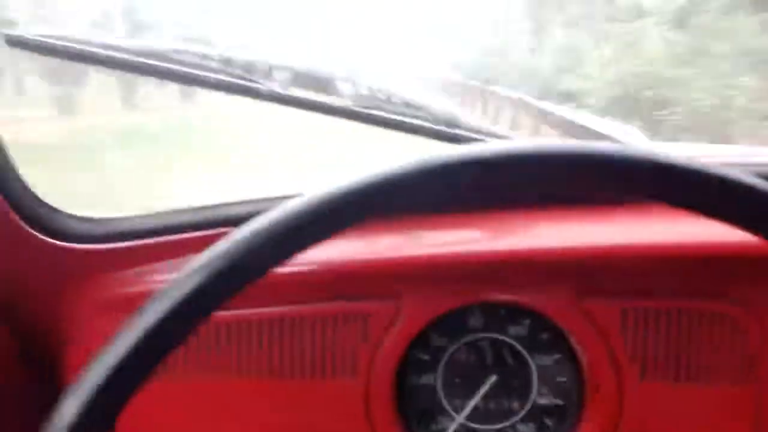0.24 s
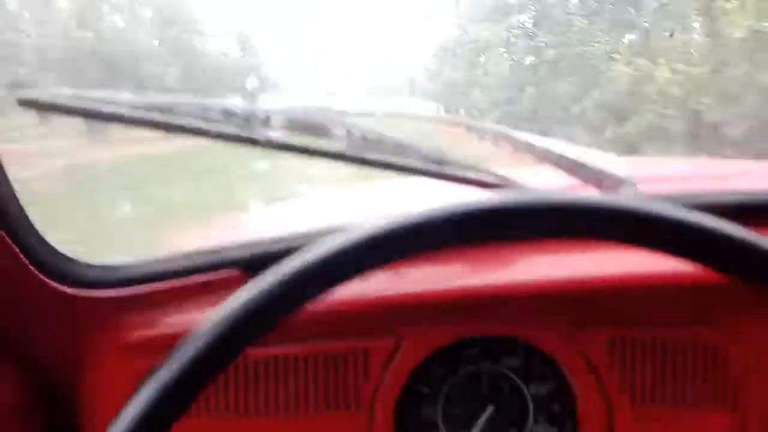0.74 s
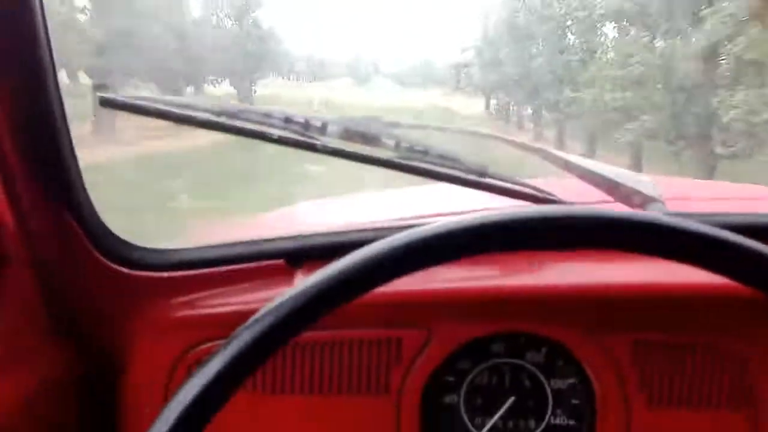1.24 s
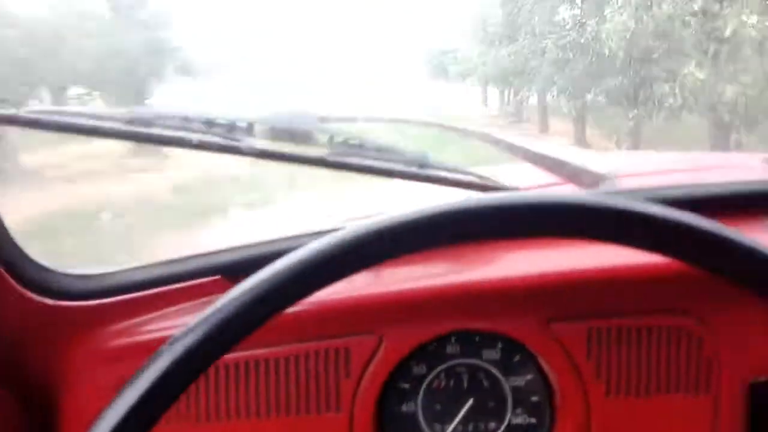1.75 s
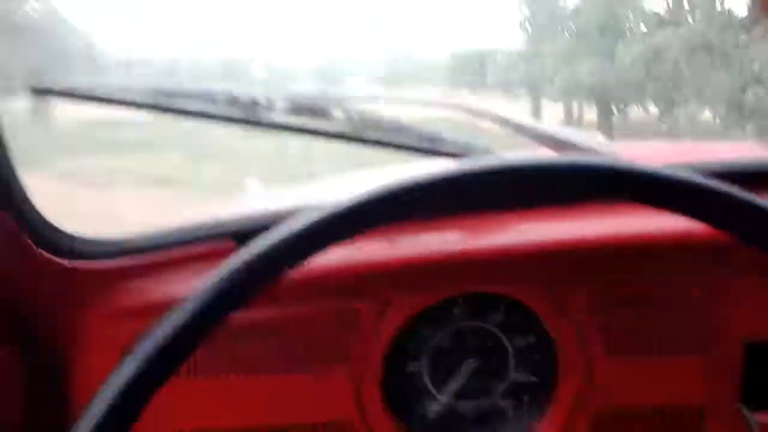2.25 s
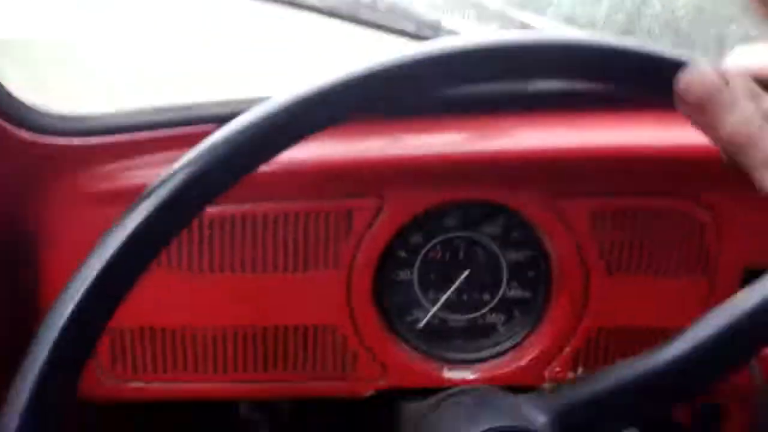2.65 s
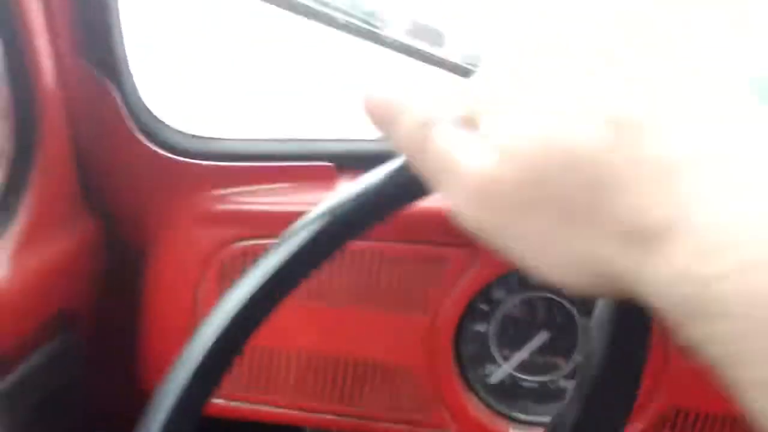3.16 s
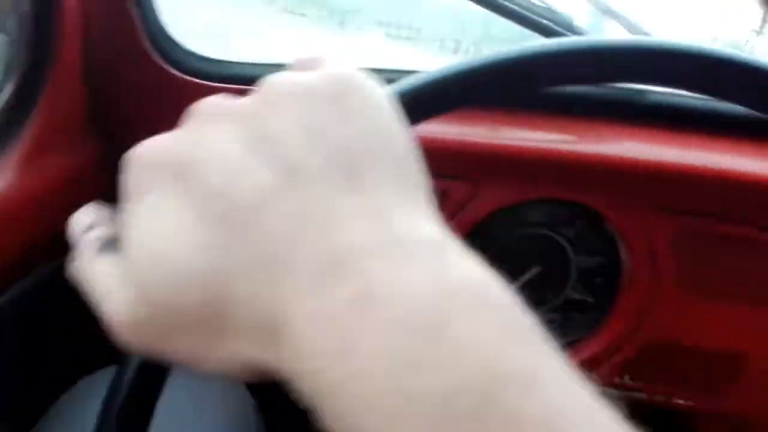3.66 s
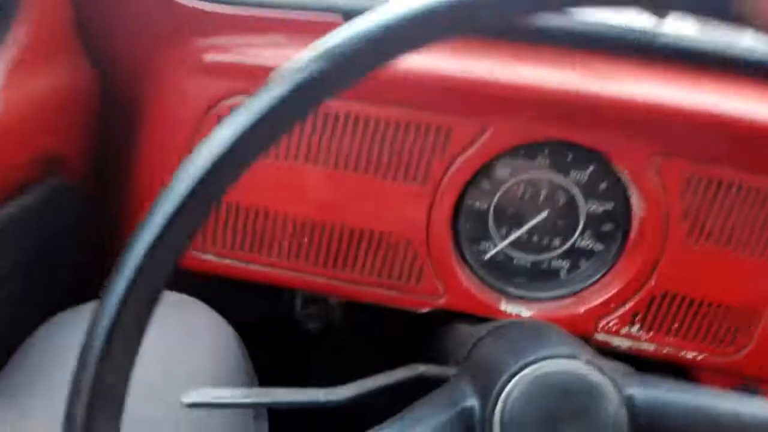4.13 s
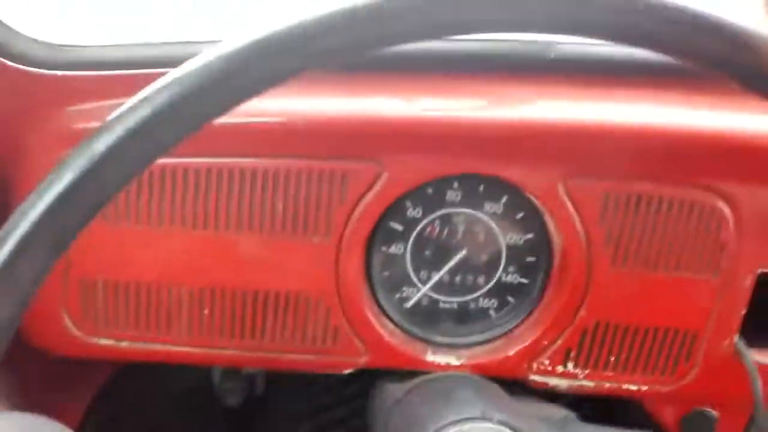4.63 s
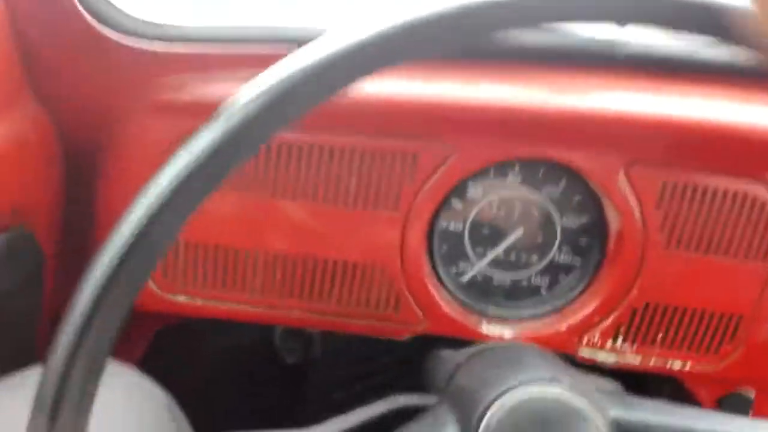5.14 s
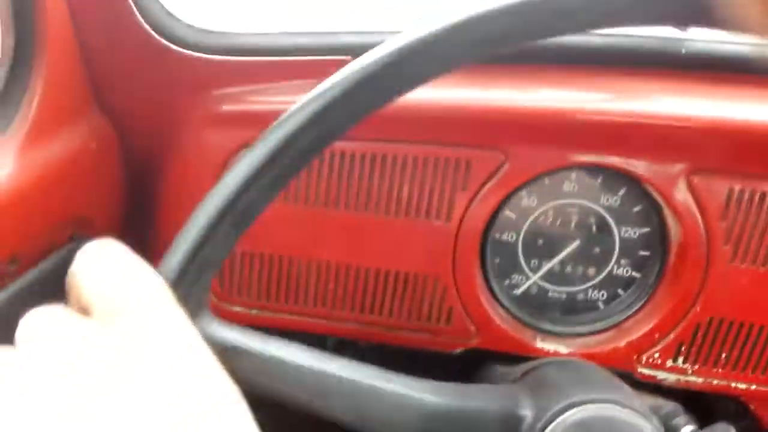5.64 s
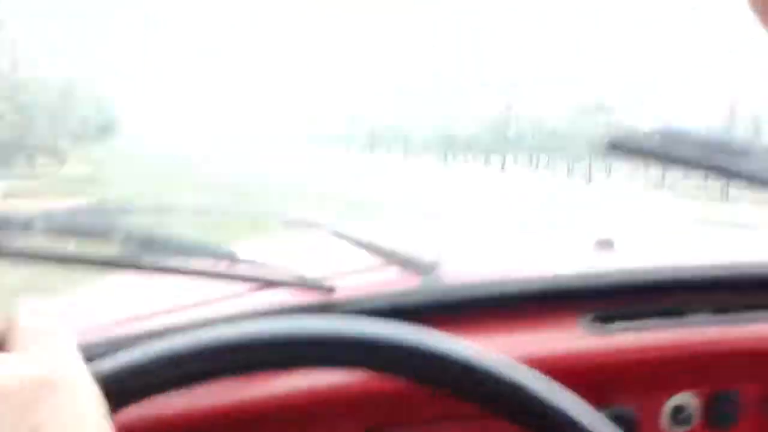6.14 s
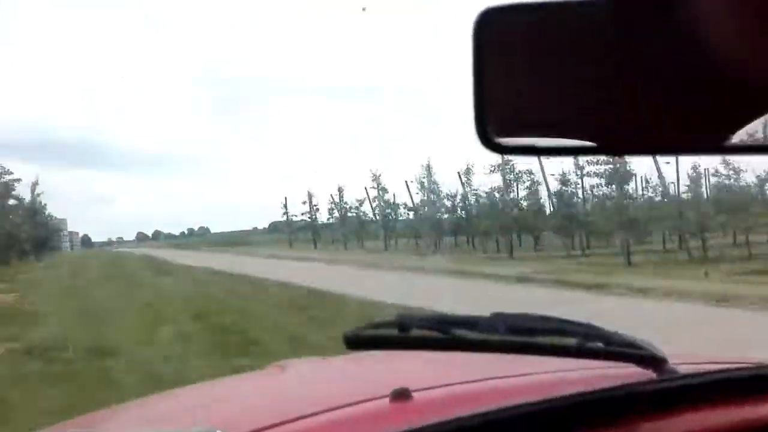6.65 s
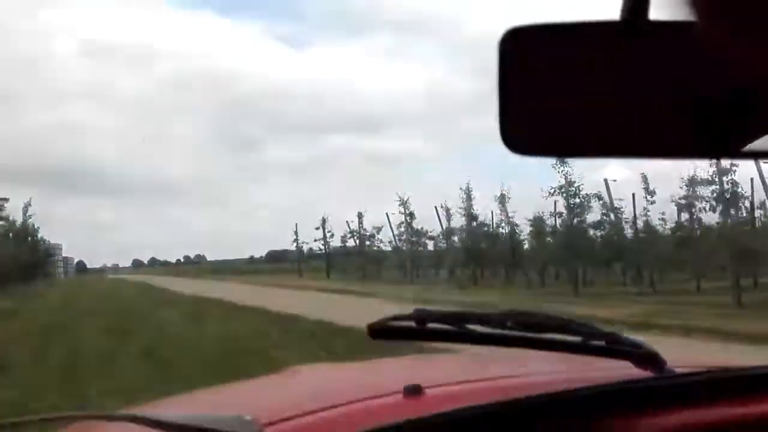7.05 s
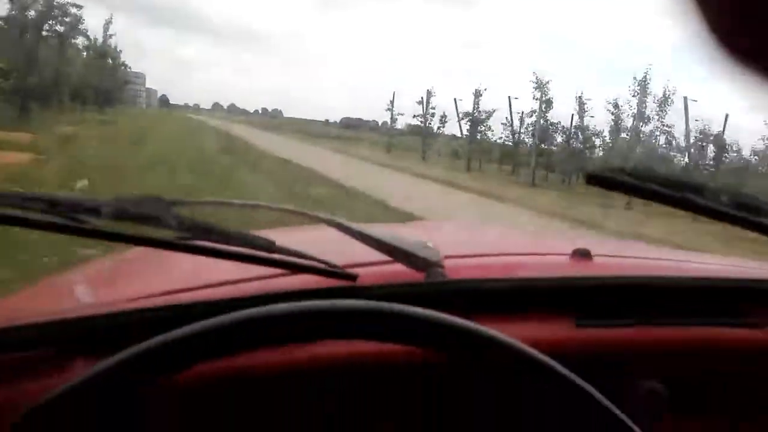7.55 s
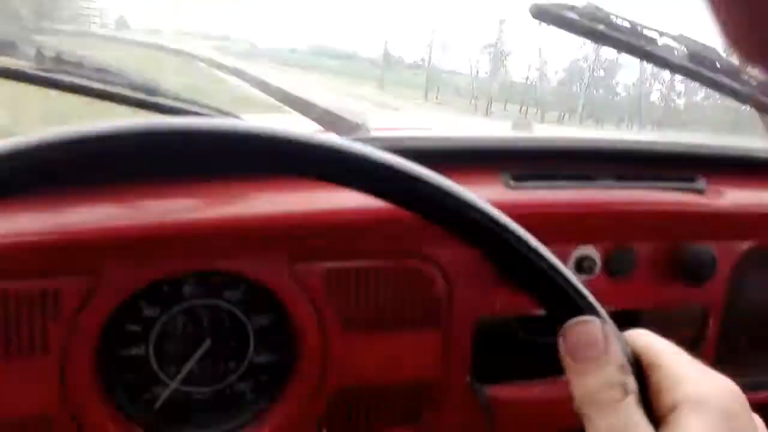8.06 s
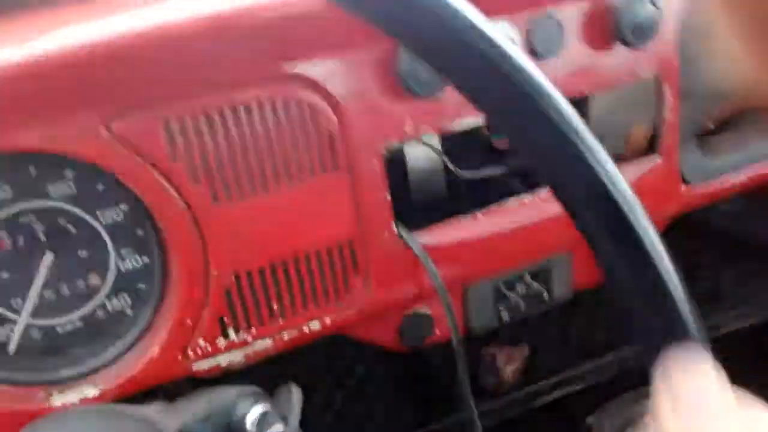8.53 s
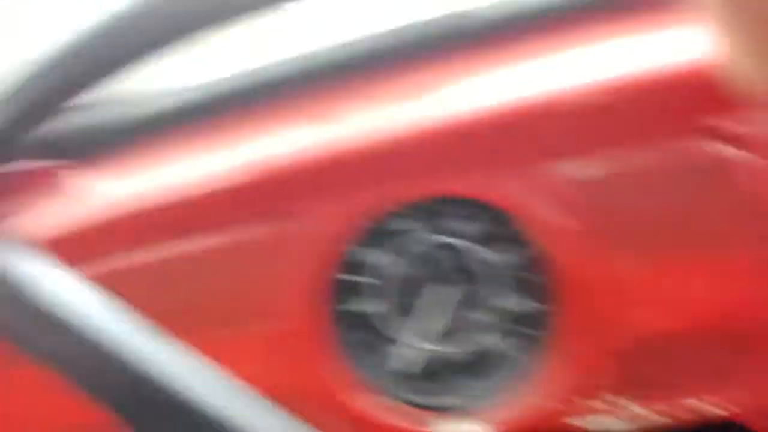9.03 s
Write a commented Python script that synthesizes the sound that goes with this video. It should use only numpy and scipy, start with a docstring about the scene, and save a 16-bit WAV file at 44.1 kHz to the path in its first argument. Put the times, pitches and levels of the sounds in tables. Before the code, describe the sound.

Close inside the cabin of an old small car, with short hard reflections from glass and steel. From 0 to 1.2 seconds the engine booms low, blips briefly near 0.5 and sags as the car lurches; panels thump, the floor drums, trim rattles and linkage clacks, with a hard hit at 1.0. From 1.2 to 4.5 the ride calms and revs steadily fall to a slow throb. Faint hand rubs come near 2.1, 2.3 and 2.8, a tiny squeak at 2.5, dull knocks from 2.7 to 3.1, clonks from 3.4 and a bump at 3.85. Metal clacks at 4.3 and 4.5. Then the engine pulls, burbling and increasingly booming, its pitch climbing to the end. Rattling surges from 5, with clonks around 5.2, sharp snaps near 5.85 and 6.05, and a bump at 6.75. A thin airy whistle and gear whine emerge after 7; rattles ease, then return by 9.

```python
"""In the driver's seat of an old air-cooled flat-four car, the microphone close to glass and bare steel.
The car first slows over bumps and ruts on a field track: panels thump, the boom sags, gear linkage clacks.
Then hands slide on the wheel rim, trim squeaks and drive slack knocks as the engine runs down for the turn.
Last it pulls away along a lane: the engine's orders boom louder, joints clonk, trim rattles and a thin
whistle rises. Orders are sines locked to the crank; clatter and rumble are filtered noise; hits ring modes."""
import sys
import numpy as np
from scipy import signal
from scipy.fft import rfft, irfft
from scipy.io import wavfile
from scipy.ndimage import uniform_filter1d

SR = 44100
rng = np.random.default_rng(int(sys.argv[2]) if len(sys.argv) > 2 else 0)


def materialize(psi):
    """Save the field psi as 16-bit PCM at rate SR to the path in sys.argv[1].

    A 1-D psi becomes a single channel; in a 2-D psi each row is a channel.
    """
    bounded = np.clip(np.atleast_2d(psi).T, -1, 1)
    quanta = np.round(bounded * 32767).astype(np.int16)
    wavfile.write(sys.argv[1], SR, quanta)


N = 409688
TIME = np.arange(N) / SR
CRUISE_HZ = 30  # crankshaft turns per second


# The cabin's gain for even orders, the firing. Each row: frequency in Hz, gain in dB.
EVEN_BOOM = [(42.0, -19.5), (58.0, -18.5), (72.0, -1.06), (88.0, 4.5), (104.0, 10), (116.0, 11.5),
             (134.0, 13), (148.0, 15), (162.0, 15), (190.0, 5.5), (210.0, 0.5), (232.0, -3), (255.0, -18),
             (320.0, -25.3)]
# The cabin's gain for odd orders, the rocking of the engine. Each row: frequency in Hz, gain in dB.
ODD_BOOM = [(58.0, -2.5), (72.0, 3), (88.0, 5), (104.0, 6.5), (116.0, 4.5), (134.0, 2), (148.0, 7),
            (162.0, 11.5), (190.0, -1), (210.0, 2), (232.0, -0.5), (255.0, -7.1), (320.0, -21.5)]
# Booming engine orders. Each row: multiple of the crank rate, level in dB at cruising revs and 0 dB throttle
# before the cabin's gain, dB per dB of throttle, dB per octave of revs.
ORDERS = [(2, -15, 0, -9), (3, -33, 0.73, 10), (4, -33, 0.79, -22), (5, -30.5, 0.89, -9.5),
          (6, -39, 0.86, 15.5), (8, -35, 1.24, 17.5)]


def boom(hz, turns, throttle, waver_db=0.8, overrun_waver_db=0.15, smear_turns=0.0753):
    """Engine orders follow throttle and revs through the cabin; higher ones lag, so the note throbs."""
    # the level wavers more as the throttle falls below 0 dB
    waver = waver_db + overrun_waver_db * np.maximum(-throttle, 0)
    octaves = revs(hz)
    out = np.zeros(N)
    for multiple, db, per_throttle, per_octave in ORDERS:
        level_db = db + per_throttle * throttle + per_octave * octaves + waver * walk(11)
        lagged_turns = turns - smear_turns * multiple
        tone = np.sqrt(2) * np.sin(2 * np.pi * multiple * lagged_turns)
        cabin_gain = response(multiple * hz, ODD_BOOM if multiple % 2 else EVEN_BOOM)
        out += tone * cabin_gain * undb(level_db)
    return out


# Lurches on the track. Each row: centre in seconds, change of the boom in dB.
LURCHES = [(.41, -3), (.66, -7), (.88, -3), (1.39, -1)]


def lurches(width_s=.05):
    """Gain of the boom: a brief sag as the car lurches."""
    return undb(sum(db * np.exp(-((TIME - s) / width_s) ** 2) for s, db in LURCHES))


# Exhaust burble. Each row: multiple of the crank rate, relative level in dB.
BURBLE = [(2.5, -2.5), (3.5, -1.5), (4.5, -11), (5.5, -8), (6.5, -8.5), (7.0, -5.5), (7.5, -3.5),
          (8.5, -7.5), (9.0, -9.5), (9.5, -3), (10.0, -9.5), (10.5, -18.5), (11.0, -13.5), (11.5, -8),
          (12.0, -13.5), (12.5, -6), (13.0, -13), (13.5, -1)]
# How the body passes the burble. Each row: frequency in Hz, gain in dB.
BODY = [(60.0, -13), (100.0, -4.5), (140.0, 1.5), (175.0, -3.5), (200.0, -14), (230.0, -3.5), (260.0, -17),
        (300.0, -21.5), (370.0, -27.5), (450.0, -33.5), (550.0, -30)]


def burble(hz, turns, throttle, burble_db=-31.5, per_throttle=.62, db_per_octave=-13, waver_db=2):
    """Unequal exhaust pipes add half and whole orders, favoured at low revs and open throttle."""
    lines = np.zeros(N)
    for multiple, db in BURBLE:
        level = undb(db + waver_db * walk(11))
        lines += order_tone(turns, multiple) * response(multiple * hz, BODY) * level
    return lines * undb(burble_db + per_throttle * throttle + db_per_octave * revs(hz))


# Roar of crankcase and tinware. Each row: frequency in Hz, relative spectral level in dB.
CASING_COLOUR = [(220, -22), (360, 4.5), (420, -6), (490, -0.5), (580, -8), (680, -2), (800, 1),
                 (950, -0.5), (1100, -3.5), (1250, -4.5), (1550, -9.5), (2100, -16), (3000, -20),
                 (6000, -56.5)]


def casing(hz, turns, shake, casing_db=-43.5, per_shake=0.26, db_per_octave=1.8,
           firing_depth=0.2, flutter_db=1):
    """Crankcase and tinware roar with each firing; impacts returning every cycle add a faint comb."""
    throb = 1 + firing_depth * np.cos(2 * np.pi * 2 * turns)  # two firings a turn
    impacts = np.zeros(N)
    for angle, strength in zip(rng.random(size=24), rng.choice([-1, 1], size=24)):
        at = np.flatnonzero(np.diff(np.floor(turns / 2 + angle)))  # once in two turns
        impacts[at] += strength * undb(3 * rng.standard_normal(len(at)))
    roar = unit(colour(unit(noise() * throb) + .4 * unit(impacts), CASING_COLOUR))
    return roar * undb(casing_db + per_shake * shake + db_per_octave * revs(hz) + flutter_db * walk(25))


# Valve clatter. Each row: frequency in Hz, relative spectral level in dB.
VALVE_COLOUR = [(900, -19.5), (1700, 3.5), (2300, 1), (2800, -5.5), (3550, 3.5), (4400, -1.5), (5200, -10),
                (6200, -18.5), (7500, -32.5), (14000, -40)]


def valves(hz, turns, shake, valve_db=-52.5, per_shake=.41, db_per_octave=1.5, hiss=0.72, flutter_db=1.96):
    """Eight valves each tap once in two turns at random strengths, over hiss; revs and shaking lift it."""
    tap, since = np.divmod(4 * turns, 1)  # tap number, and the part of a tap interval since
    strengths = undb(3.5 * np.clip(rng.standard_normal(size=2048), -2, 2))
    gate = hiss + strengths[tap.astype(int)] * np.exp(-since / .35)
    clatter = unit(colour(noise() * gate, VALVE_COLOUR))
    return clatter * undb(valve_db + per_shake * shake + db_per_octave * revs(hz) + flutter_db * walk(30))


# Rumble of the body on its springs. Each row: frequency in Hz, relative spectral level in dB.
RUMBLE_COLOUR = [(8, -24.5), (16, -9.5), (26, -1), (42, 0.5), (56, -8), (80, -21.5), (140, -47.5)]
# Drumming of the floor pan. Each row: frequency in Hz, relative spectral level in dB.
DRUM_COLOUR = [(35, -19), (60, -1), (100, 0), (165, -3), (195, -10), (230, -11), (270, -12), (330, -27.5),
               (420, -34.5), (700, -50.5)]


def wheels(hz, shake, rumble_db=-23.0, rumble_per_shake=.28, sway_db=0.6,
           drum_db=-30.5, drum_per_shake=.13, drum_db_per_octave=2):
    """The body sways and the floor pan drums, more on rough ground; the drumming also grows with revs."""
    rumble = unit(colour(noise(), RUMBLE_COLOUR))
    rumble *= undb(rumble_db + rumble_per_shake * shake + sway_db * walk(8.7))
    drum = unit(colour(noise(), DRUM_COLOUR))
    return rumble + drum * undb(drum_db + drum_per_shake * shake + drum_db_per_octave * revs(hz))


def ruts(centre_s=0.7, half_s=0.49, drum_db=-22.5):
    """A stretch of ruts makes the floor pan drum harder."""
    return unit(colour(noise(), DRUM_COLOUR)) * undb(drum_db) * np.exp(-((TIME - centre_s) / half_s) ** 2)


# Wheels hit bumps. Each row: middle in seconds, peak level in dB, pitch in Hz.
BUMPS = [(.089, -7, 45.2), (.731, -9.5, 41.5), (.793, -11, 48), (1.0, -4.5, 49.67), (2.378, -20, 40.47),
         (2.605, -20, 53.74), (2.722, -25, 41.98), (3.86, -13, 41.98), (5.447, -9, 42.21),
         (6.745, -10, 41.87)]
# Slack in the drive knocks off throttle. Each row: middle in seconds, peak level in dB, pitch in Hz.
KNOCKS = [(.88, -14.5, 162.9), (.99, -23, 330), (2.711, -16, 159.6), (2.846, -19, 167), (2.983, -14.5, 154),
          (3.125, -17, 160.4)]


def thumps(table, cycles):
    """Soft blows swing the panels briefly; the bell envelope falls to 1/e at `cycles` periods each side."""
    out = np.zeros(N)
    for s, db, hz in table:
        since = TIME - s
        out += undb(db) * np.cos(2 * np.pi * hz * since) * np.exp(-(since * hz / cycles) ** 2)
    return out


# Suspension clonks. Each row: start in seconds, loudest short-term level in dB.
CLONKS = [(1.945, -42), (3.403, -42.5), (3.527, -45), (3.671, -39.5), (3.905, -40), (3.965, -43),
          (4.860, -34.5), (4.922, -41), (5.157, -30), (5.369, -39), (5.455, -39), (6.727, -38.5),
          (7.076, -40.5), (9.189, -37.5)]
# Suspension and panel modes. Each row: frequency in Hz, width in Hz, gain in dB.
CLONK_MODES = [(333, 28, 8), (388, 7.9, -0.5), (660, 34, -3), (965, 41, -4), (1202, 40, 3), (1770, 78, -23),
               (2180, 92, -19), (3330, 320, -19.5)]


def clonks(contact_hz=3800):
    """Rubber-mounted joints hit their stops and ring the panels."""
    return blows(CLONKS, lambda x: modes(x, CLONK_MODES, contact_hz), rise_s=0.00083, hold_s=0.0061, t60=0.072)


# Gear lever and loose fittings. Each row: start in seconds, level in dB before the cabin's echoes,
# level of the rebound in dB relative to the first blow.
CLACKS = [(.389, -38.5, -19), (.562, -44.5, -12), (1.012, -45, -9), (1.151, -44, -15.5), (2.352, -40.5, -8),
          (4.265, -35, -4), (4.547, -40.5, 2)]
# Ring of the gear linkage. Each row: frequency in Hz, width in Hz, gain in dB.
CLACK_MODES = [(884, 50, 7.5), (1040, 22, 15), (1210, 820, 3), (1440, 89, 2.5), (1750, 66, 2.5),
               (1930, 490, -3), (2220, 110, -14), (2640, 50, -11), (3400, 88, -6), (3540, 110, -6),
               (3900, 33, -20.5), (4400, 120, 2)]


def clacks(contact_hz=4500, rasp_db=-31, rasp_hz=6500, rebound_s=.04):
    """Metal linkage chatters into place and rebounds once, with a little rasp of the contact itself."""
    hits = []
    for s, db, rebound_db in CLACKS:
        hits += [(s, db), (s + rebound_s, db + rebound_db)]
    soften = signal.butter(3, rasp_hz, fs=SR, output="sos")

    def ring(x):
        """Linkage modes plus the softened contact noise."""
        return modes(x, CLACK_MODES, contact_hz) + undb(rasp_db) * signal.sosfilt(soften, x)

    return blows(hits, ring, rise_s=.0004, hold_s=0.016, t60=0.14)


# Hard hits on dashboard and floor. Each row: start in seconds, level in dB before the cabin's echoes, ring in Hz.
SNAPS = [(0.268, -57, 2900), (.991, -35, 810), (2.985, -47, 1001), (3.163, -51.5, 2592),
         (3.845, -46.5, 1491), (5.848, -35.5, 1090), (6.061, -39, 920), (8.271, -42, 998.7)]


def snaps():
    """Hard, short hits on the dashboard and floor, each with one broad ring."""
    out = np.zeros(N)
    for s, db, hz in SNAPS:
        ring = lambda x: modes(x, [(hz, hz, 0)], 1.95 * hz)
        out += blows([(s, db)], ring, rise_s=0.00039, hold_s=0.0089, t60=0.13)
    return out


# Sharpest ticks of loose trim. Each row: start in seconds, level in dB before the trim's colour.
TICKS = [(.1216, -50), (.161, -44.5), (.2708, -42.5), (.602, -49), (.7456, -48.5), (.8081, -50),
         (1.0065, -43), (2.359, -43.5), (3.1622, -55.5), (3.8413, -53.5), (3.8643, -49), (4.3057, -53.5),
         (4.5865, -48.5), (5.018, -48.5), (5.1131, -43.5), (5.2943, -47.5), (5.5706, -42), (5.6133, -43.5),
         (5.8494, -43), (6.0808, -44), (8.2608, -42.5)]
# Colour of the loose trim. Each row: frequency in Hz, gain in dB.
TRIM_COLOUR = [(700, -13.5), (1300, 4), (2800, 3.5), (4200, 5), (6000, -6.5), (7500, -13), (9400, -9.5),
               (11000, -18), (13000, -13), (14500, -17)]


def trim(shake, rattle_db=-54, per_shake=0.95, scatter_db=4.0, count=800):
    """Loose trim rattles at random as the ground shakes it, with some sharper ticks and one squeak."""
    times = rng.random(count) * N / SR
    levels = scatter_db * np.clip(rng.standard_normal(count), -2, 2)
    rattle = unit(blows(np.column_stack([times, levels]), small_part, rise_s=0.002, hold_s=.003, t60=0.053))
    rattle *= undb(rattle_db + per_shake * shake)
    ticks = blows(TICKS, small_part, rise_s=.0008, hold_s=0.0022, t60=0.062)
    squeal = lambda x: resonate(resonate(x, 5890, 50), 5890, 50)
    squeak = blows([(2.488, -59)], squeal, rise_s=.002, hold_s=.02, t60=.07)  # s, dB
    return colour(rattle + ticks, TRIM_COLOUR) + squeak


def small_part(x, ring_db=10):
    """Every loose part has four high resonances of its own, at random pitches."""
    return x + undb(ring_db) * sum(resonate(x, hz, 500) for hz in rng.uniform(3000, 13500, size=4))


# Hands slide along the wheel rim. Each row: middle in seconds, half length in seconds, level in dB before
# the uneven grip and the cabin's echoes.
SLIDES = [(2.074, 0.094, -68), (2.26, 0.072, -60.5), (2.82, .07, -62)]
# Colour of skin on the rim. Each row: frequency in Hz, relative spectral level in dB.
SLIDE_COLOUR = [(2000, 0.5), (4200, 5), (5600, -7), (7300, -8.5), (9000, -25.5), (13000, -32)]


def slides(grip_db=5.0):
    """Skin rubs unevenly on the steering wheel: noise whose level jitters within each swell."""
    swell = sum(undb(db) * np.exp(-((TIME - s) / half_s) ** 2) for s, half_s, db in SLIDES)
    return unit(colour(noise(), SLIDE_COLOUR)) * swell * undb(grip_db * walk(60))


# The fan and gears sing as the car gathers speed. Each row: time in seconds, reference level in dB.
WHISTLE = [(0, -82), (6.6, -74), (7.2, -66.5), (8, -62.5), (8.6, -61.5), (9.29, -60)]
# Resonances of the fan housing. Each row: frequency in Hz, width in Hz of each of two passes, gain in dB.
FAN_MODES = [(827, 50, -1), (2384, 53, 2.5), (3410, 130, -4)]
# Whine of the geared shafts. Each row: multiple of the crank rate, mean level in dB relative to WHISTLE.
WHINE = [(10.5, 3.5), (17, 1.5), (23, 1.5), (24.5, -0.5)]


def whistle(turns, air_db=2):
    """Air sings in the fan housing, with the whine of the gears alongside."""
    air = np.zeros(N)
    for hz, width, db in FAN_MODES:
        air += undb(db) * resonate(resonate(noise(), hz, width), hz, width)
    whine = sum(order_tone(turns, multiple) * undb(db + 2 * walk(4.8)) for multiple, db in WHINE)
    return (undb(air_db) * unit(air) + whine) * undb(curve(WHISTLE))


def cabin(x, echo_gain=.25, t60=.16):
    """Glass and bare steel close by: dense early echoes comb the clatter."""
    t = TIME[:SR // 8]
    echoes = rng.standard_normal(len(t)) * np.exp(-np.log(1000) * t / t60) * (t > .003)
    wet = signal.fftconvolve(x, echoes / np.linalg.norm(echoes))[:N]
    return (x + echo_gain * wet) / np.hypot(1, echo_gain)


def blows(table, ring, rise_s, hold_s, t60):
    """Each blow is a short chatter of contacts through the object's resonances, at its own level."""
    out, t = np.zeros(N + SR), TIME[:SR // 3]
    shape = (1 - np.exp(-t / rise_s)) * np.exp(-np.log(1000) * np.maximum(t - hold_s, 0) / t60)
    for s, db in table:
        sound = ring(rng.standard_normal(len(t)) * shape)
        loudest = np.sqrt(uniform_filter1d(sound ** 2, size=600).max())  # rms over 14 ms
        i = int(np.clip(s * SR, 0, N))
        out[i:i + len(t)] += undb(db) * sound / loudest
    return out[:N]


def modes(x, table, contact_hz):
    """A bank of resonances; a soft contact drives it little above contact_hz."""
    x = signal.sosfilt(signal.butter(8, contact_hz, fs=SR, output="sos"), x)
    return sum(undb(db) * resonate(x, hz, width) for hz, width, db in table)


def resonate(x, hz, width_hz):
    """One resonance, gain 1 at its centre."""
    return signal.lfilter(*signal.iirpeak(hz, hz / width_hz, fs=SR), x)


def order_tone(turns, multiple):
    """One engine order at rms 1, with a random phase."""
    return np.sqrt(2) * np.sin(2 * np.pi * (multiple * turns + rng.random()))


def revs(hz):
    """Engine speed in octaves above cruising."""
    return np.log2(hz / CRUISE_HZ)


def response(hz, points):
    """Gain of a (Hz, dB) spectrum at the given frequencies, -80 dB beyond its ends."""
    f, db = np.transpose(points)
    return undb(np.interp(np.log(hz + 1e-9), np.log(f), db, left=-80, right=-80))


def colour(x, points):
    """Filter by a (Hz, dB) spectrum."""
    return irfft(rfft(x) * response(np.fft.rfftfreq(N, 1 / SR), points), N)


def noise():
    """White noise."""
    return rng.standard_normal(N)


def walk(rate):
    """Slow chance at rms 1: random levels, `rate` per second, joined by lines and smoothed."""
    levels = np.interp(TIME * rate, np.arange(2048), rng.standard_normal(2048))
    return unit(uniform_filter1d(levels, int(SR / rate)))


def unit(x):
    """Scale to rms 1."""
    return x / np.sqrt(np.mean(x ** 2))


def undb(db):
    """Decibels to gain."""
    return 10 ** (np.asarray(db) / 20)


def curve(table):
    """The second column of a table, drawn over time as a value per sample."""
    s, value = np.transpose(table)
    return np.interp(TIME, s, value)


# Engine speed: a blip, a long run down into the turn, a steady pull. Each row: time in seconds, crank turns in Hz.
SPEED = [(0, 42.1), (.1, 38.56), (.36, 37.6), (.54, 42.6), (.72, 37.22), (1.0, 36.35), (1.2, 36.76),
         (1.6, 35.05), (2.0, 33.58), (2.4, 31.58), (3.0, 28.51), (3.2, 26.35), (3.6, 24.78), (3.8, 23.1),
         (4.2, 21.94), (4.47, 21.06), (4.9, 22.78), (5.6, 24.36), (5.85, 25.98), (6.4, 27.54),
         (6.75, 29.67), (7.5, 31.95), (8.6, 34.57), (9.29, 37.25)]
# Throttle, as the strength of the firings. Each row: time in seconds, strength in dB.
THROTTLE = [(0.0, 0.5), (0.2, -4), (0.5, -1.5), (0.9, -4), (1.25, -7), (1.7, -9), (2.2, -10.4), (2.8, -12),
            (3.35, -7), (4.15, -9), (4.7, -2.4), (5.9, 1.5), (6.9, 1.5), (8.2, 1.35), (9.29, 4)]
# How hard the ground shakes the car. Each row: time in seconds, strength in dB.
SHAKE = [(0, -2.5), (.48, -13), (.85, -1.5), (1.05, -5.5), (1.22, -18.5), (1.8, -16.5), (2.25, -14),
         (2.85, -15), (3.25, -23.5), (3.68, -27), (3.85, -8.5), (4.08, -31), (4.48, -26), (5.05, -2),
         (5.6, -0.5), (6.3, -3.5), (7.1, -3.5), (7.65, -11.5), (8.7, -6.5), (9.1, -2)]


def scene():
    """Engine speed, throttle and ground shake shape the steady sounds that reach the driver's seat."""
    hz = curve(SPEED) * (1 + .002 * walk(18))  # slightly unsteady
    turns = np.cumsum(hz) / SR
    throttle, shake = curve(THROTTLE), curve(SHAKE)
    exhaust = boom(hz, turns, throttle) * lurches() + burble(hz, turns, throttle)
    engine_clatter = casing(hz, turns, shake) + valves(hz, turns, shake)
    clatter = cabin(engine_clatter + trim(shake) + clacks() + snaps() + slides())
    chassis = wheels(hz, shake) + ruts() + thumps(BUMPS, cycles=0.56) + thumps(KNOCKS, cycles=1.35) + clonks()
    return (exhaust + whistle(turns) + clatter + chassis)[None]


def record(dry, top_hz=14100, ease_s=.004):
    """The microphone signal eases in and out and loses its top above top_hz."""
    ease = np.clip(np.minimum(TIME, TIME[::-1]) / ease_s, 0, 1)
    return signal.sosfilt(signal.ellip(8, .2, 70, top_hz, fs=SR, output="sos"), dry * ease)


dry = scene()
out = record(dry)
materialize(out)
```